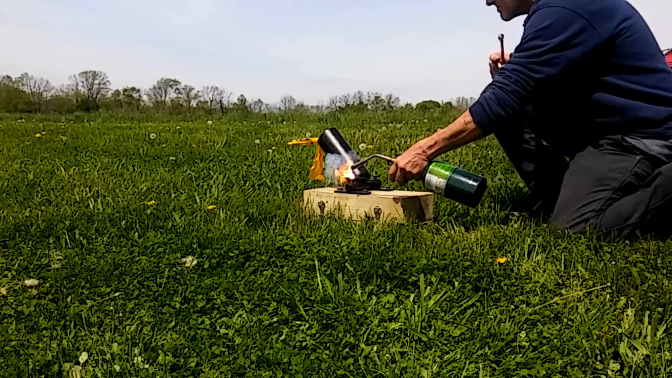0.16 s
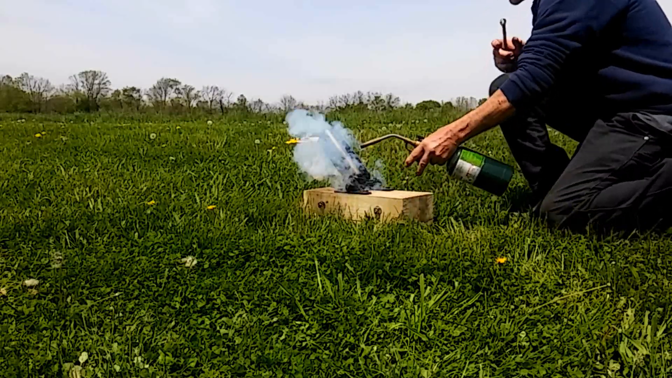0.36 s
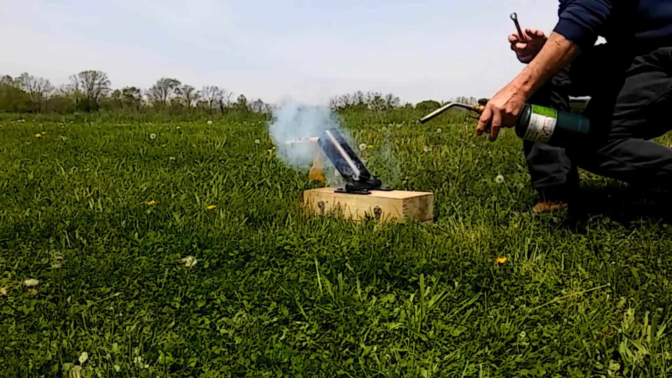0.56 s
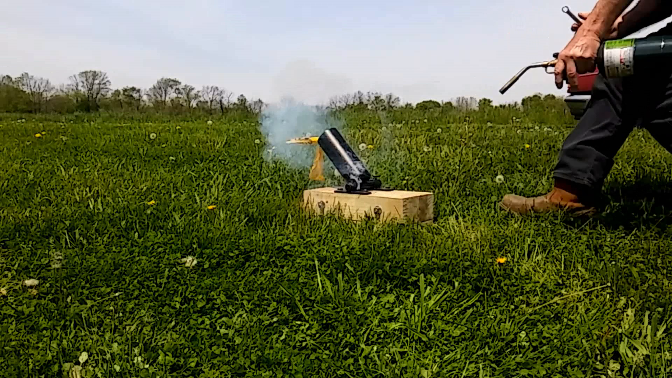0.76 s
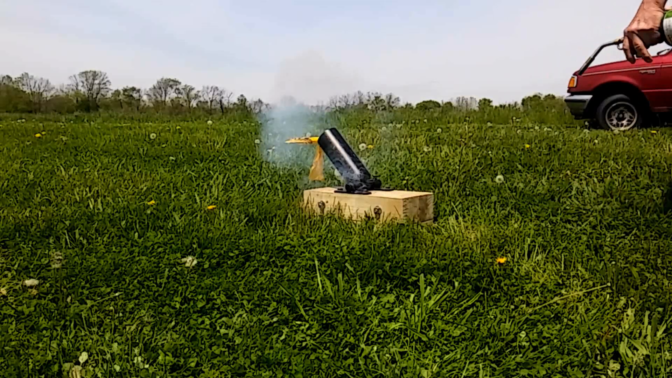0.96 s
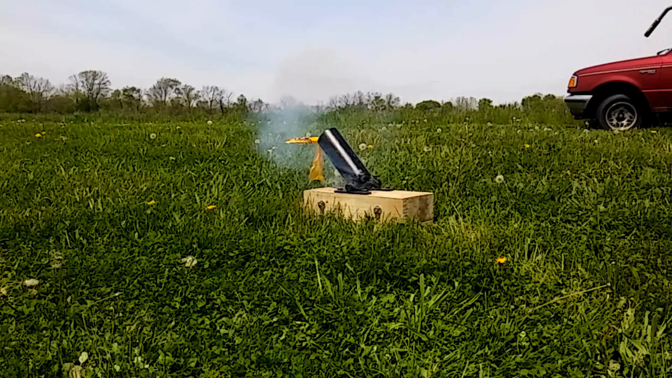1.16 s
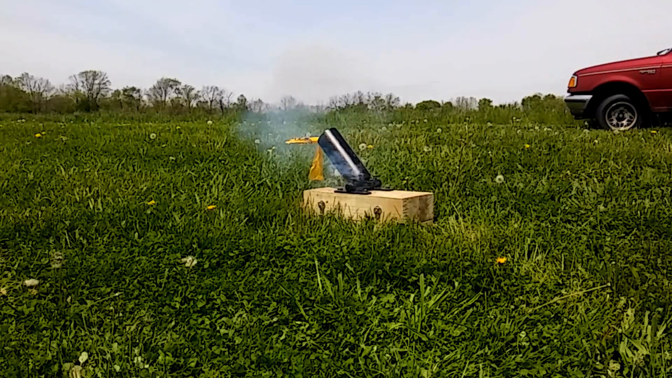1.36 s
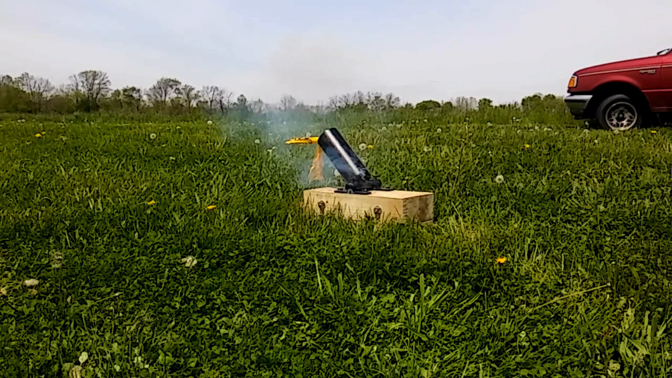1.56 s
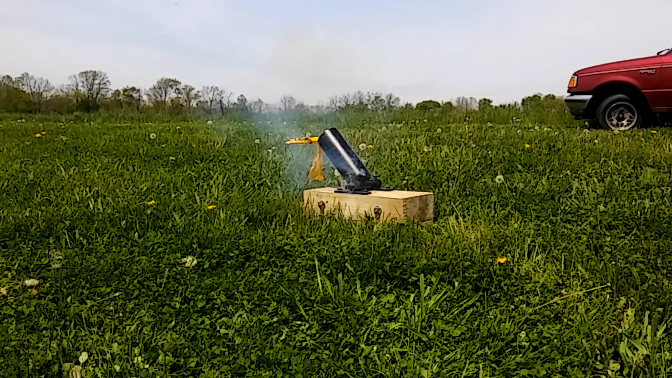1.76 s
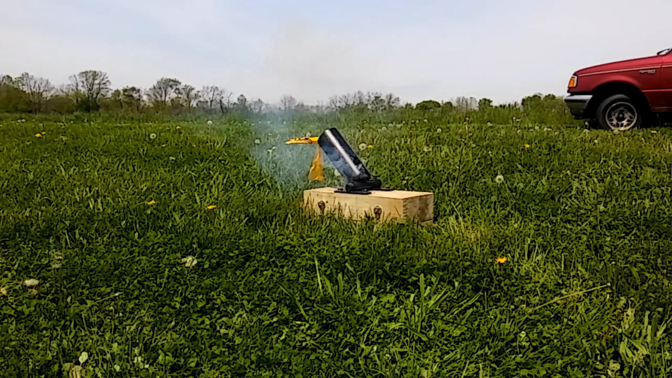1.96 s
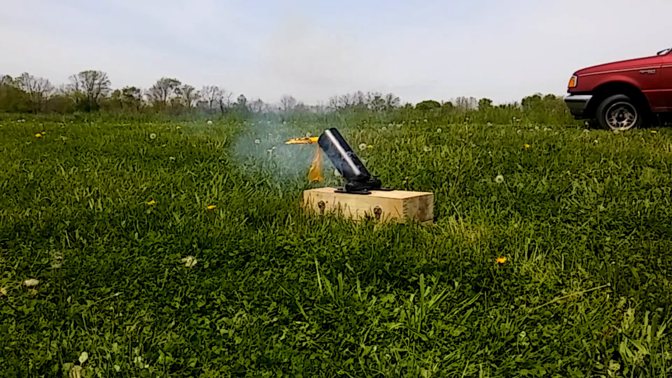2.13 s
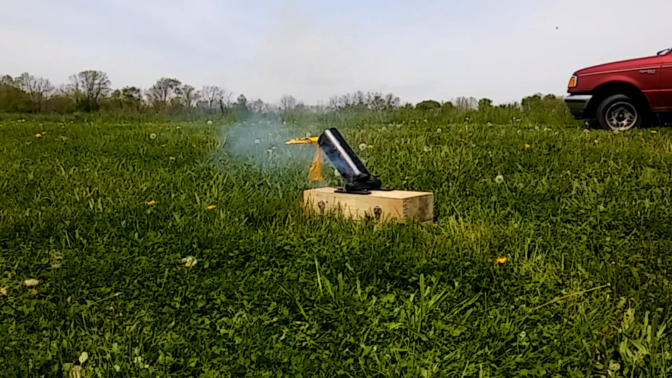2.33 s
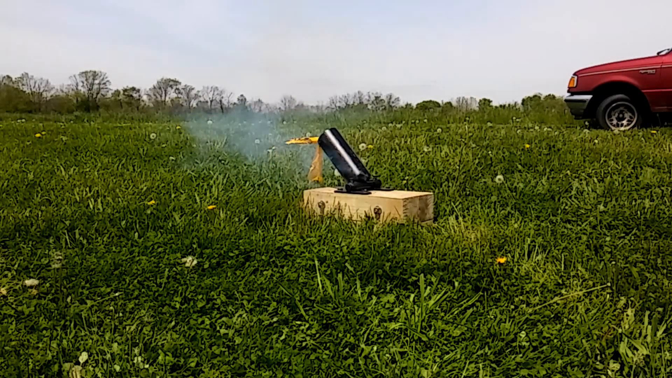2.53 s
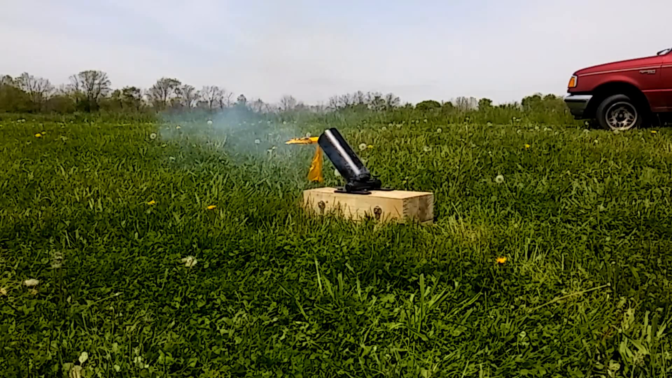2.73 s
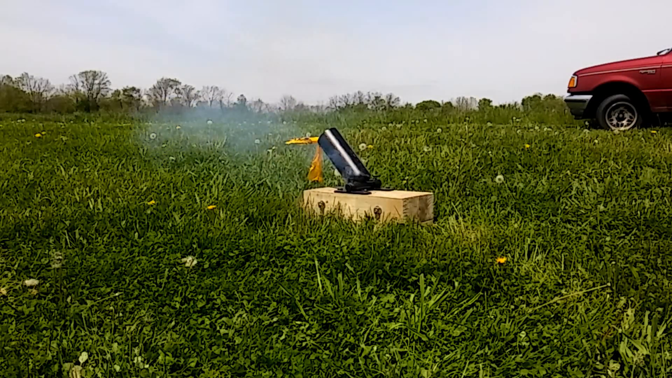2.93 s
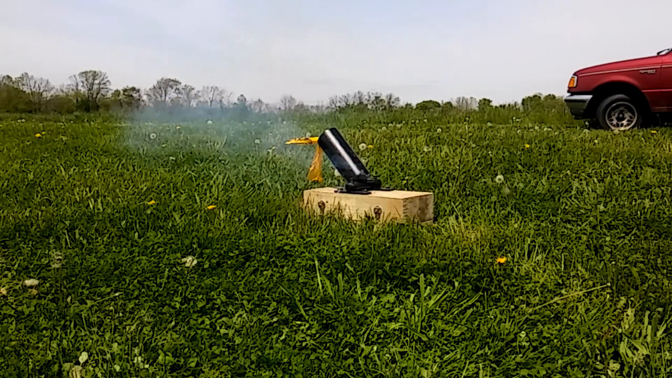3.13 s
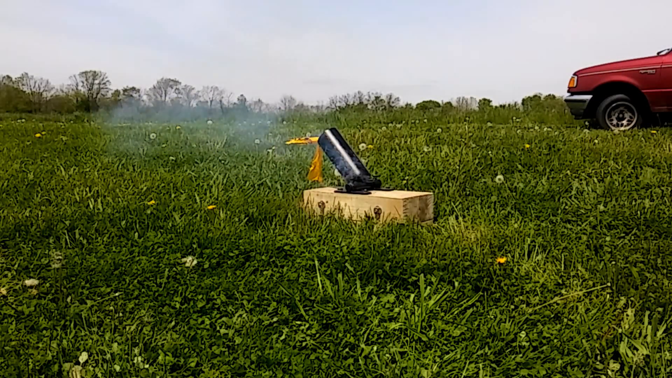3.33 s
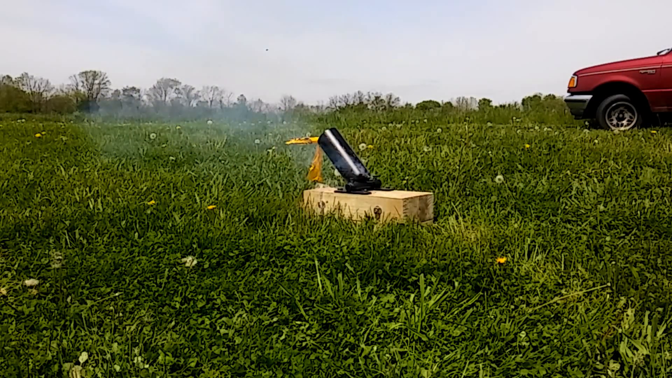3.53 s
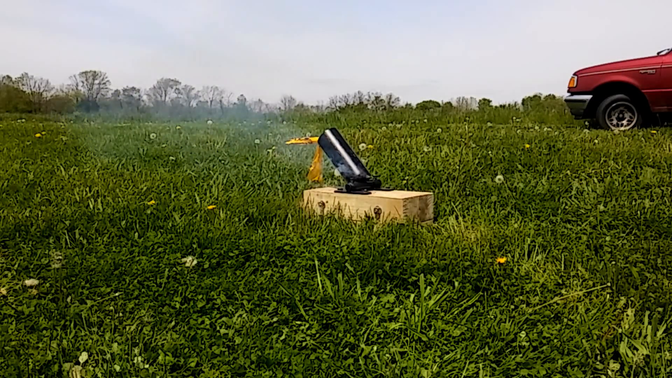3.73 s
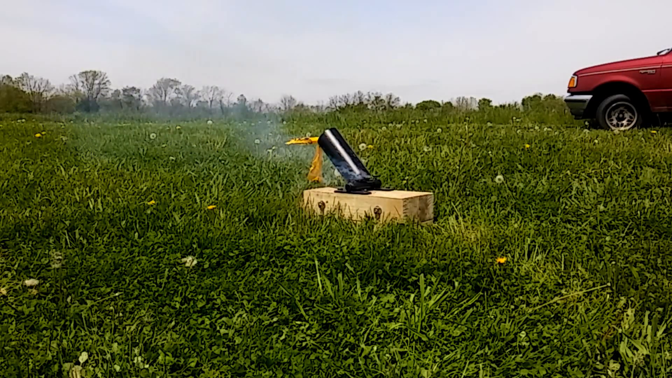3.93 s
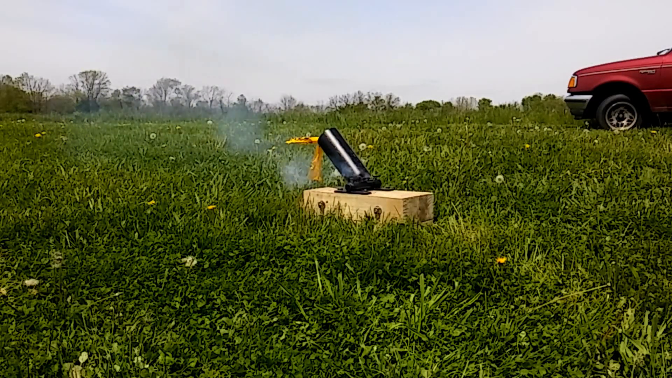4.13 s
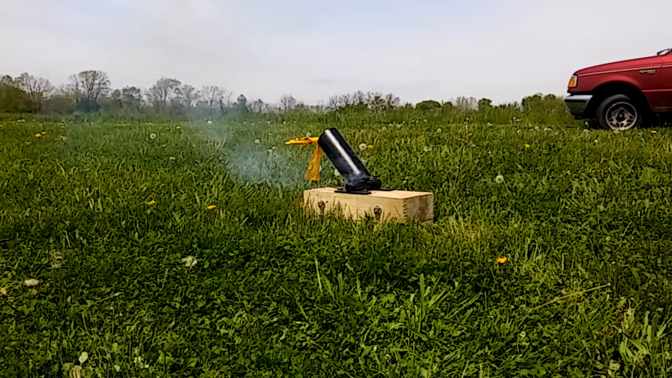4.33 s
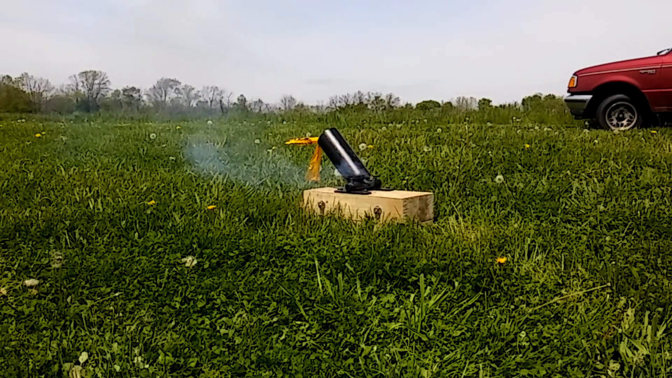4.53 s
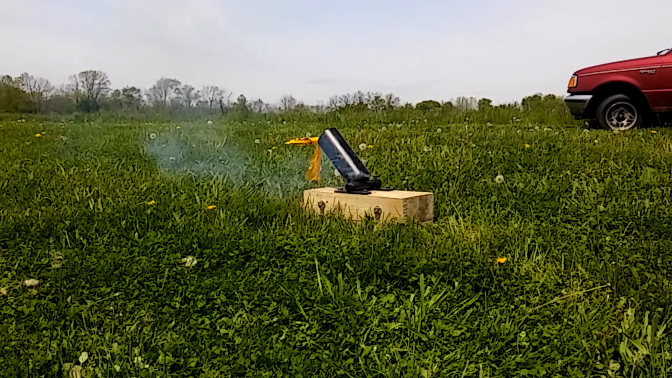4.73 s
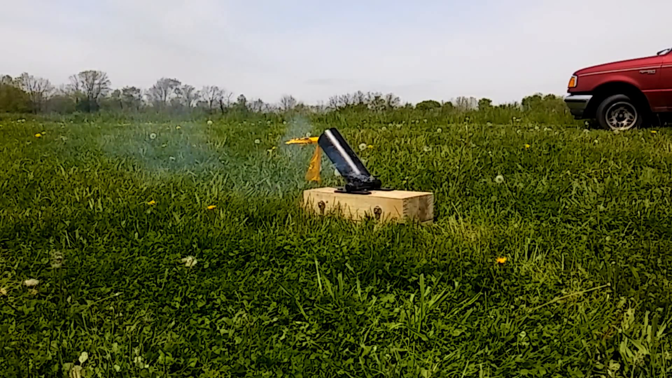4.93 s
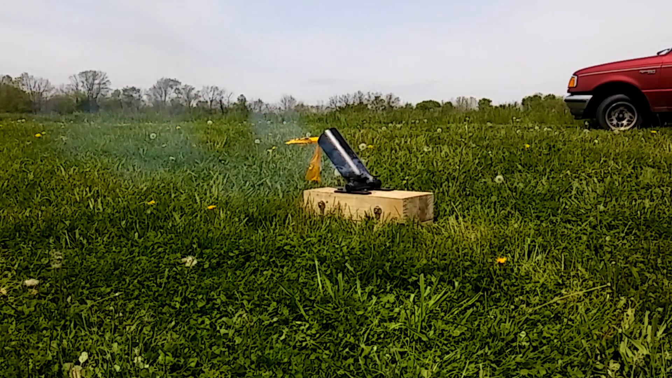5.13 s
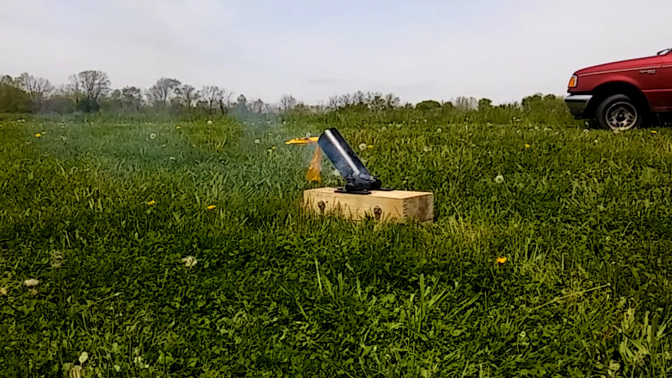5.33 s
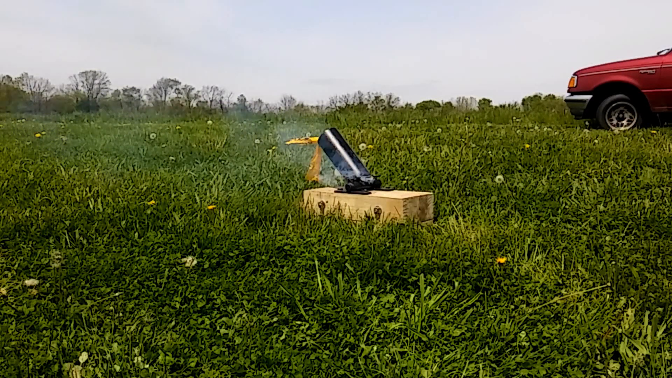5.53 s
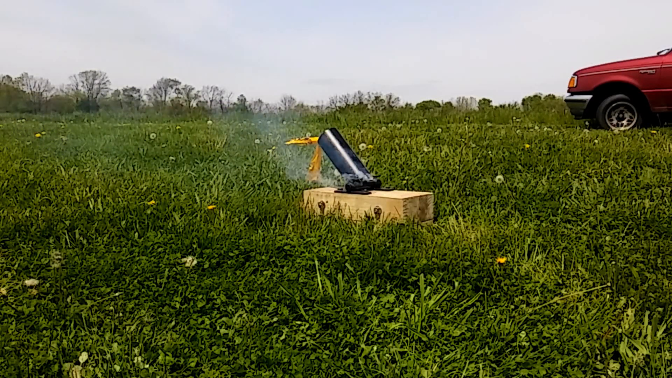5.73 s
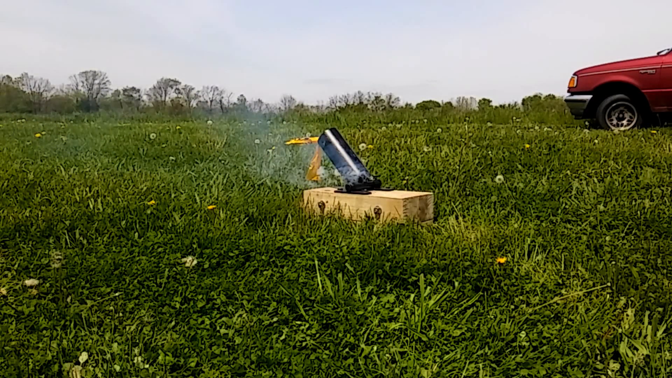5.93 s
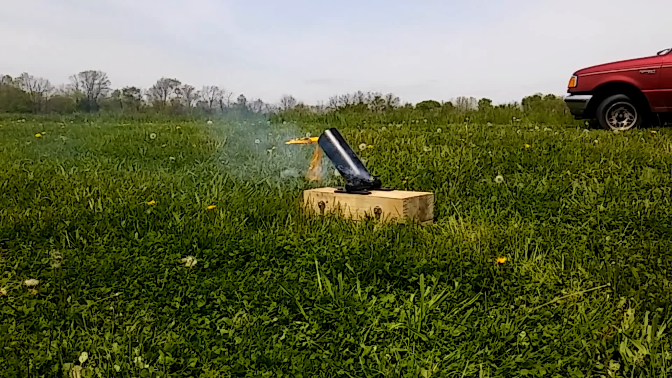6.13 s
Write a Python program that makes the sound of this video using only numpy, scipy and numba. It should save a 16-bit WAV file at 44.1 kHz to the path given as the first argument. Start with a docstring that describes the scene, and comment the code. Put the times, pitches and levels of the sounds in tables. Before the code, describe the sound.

A gas torch roars briefly, then a lit fuse hisses and sputters steadily in an open field, with soft thuds and faint wind beneath.

```python
"""A gas torch roars for a moment in an open field, lights a fuse and is carried off. Flame and gas hiss are
shaped noise; puffs of a wavering note sing in the burner tube. The fuse is a noisy jet of hot gas that surges
and falters, shifting colour as it burns down towards the barrel, with a few sparks that burst.
Soft thuds, a short low hum, light wind and the murmur of the field lie beneath.
One small microphone stands a few metres away."""
import sys
import numpy as np
from scipy import signal
from scipy.fft import rfft, irfft
from scipy.io import wavfile
from scipy.ndimage import uniform_filter1d, map_coordinates
from numba import njit

SR = 44100
rng = np.random.default_rng(int(sys.argv[2]) if len(sys.argv) > 2 else 0)


def master_out(mix):
    """Clip the mix to full scale and print it as 16-bit PCM to the path in sys.argv[1]."""
    frames = np.transpose(np.atleast_2d(mix))
    ceiling = np.clip(frames, -1, 1)
    pcm = np.round(ceiling * 32767).astype(np.int16)
    wavfile.write(sys.argv[1], SR, pcm)


N = 277464  # length in samples


def undb(db):
    """Turn decibels into a plain gain."""
    return 10 ** (np.asarray(db) / 20)


def unit(x):
    """Scale a signal to an rms (average strength) of 1."""
    return x / np.sqrt(np.mean(x ** 2))


def noise():
    """Plain hiss, equally strong at all pitches."""
    return rng.standard_normal(N)


def curves(table):
    """Join the rows of a table with straight lines in time, one line per column after the seconds."""
    s, *columns = np.transpose(table)
    return [np.interp(np.arange(N) / SR, s, c) for c in columns]


def coloured(x, points):
    """Shape the spectrum of a signal to (Hz, dB) points, then set its rms to 1."""
    hz, db = np.transpose(points)
    f = np.arange(N // 2 + 1) * SR / N + 1  # 1 Hz is added so that the logarithm exists at zero
    gain_db = np.interp(np.log(f), np.log(hz), db, left=-120)
    return unit(irfft(rfft(x) * undb(gain_db), N))


def walk(rate):
    """Random levels, `rate` new ones a second, smoothed twice into a wandering line of rms 1."""
    k = int(SR / rate)
    steps = np.repeat(rng.standard_normal(N // k + 1), k)
    return unit(uniform_filter1d(uniform_filter1d(steps, k), k)[:N])


def restless(x, lo_hz, count, own_db, rate, tilt_db=0):
    """Half-octave bands that each flicker alone; a tilt lifts the upper ones and lowers the lower ones."""
    octave = np.log2((np.arange(N // 2 + 1) * SR / N + 1) / lo_hz)
    spectrum, out = rfft(x), 0
    for k in range(count):
        share = np.interp(2 * octave, np.arange(count), np.arange(count) == k)
        height = 2 * k / (count - 1) - 1  # -1 for the lowest band, 1 for the highest
        out = out + irfft(spectrum * share, N) * undb(own_db * walk(rate) + tilt_db * height)
    return out


@njit
def band(x, hz, width):
    """Keep a band around a moving centre, with gain 1 there (a state-variable filter)."""
    y, b, l = np.empty(len(x)), 0., 0.
    for i in range(len(x)):
        g, k = np.tan(np.pi * hz[i] / SR), width / hz[i]
        v = (b + g * (x[i] - l)) / (1 + g * (g + k))
        b, l, y[i] = 2 * v - b, l + 2 * g * v, k * v
    return y


def tone(hz):
    """A pure tone of rms 1 that follows a line of pitch."""
    return np.sqrt(2) * np.sin(2 * np.pi * np.cumsum(hz) / SR)


def swell(at_s, rise_s, fall_s):
    """A smooth bump, 1 at its moment."""
    t = np.arange(N) / SR - at_s
    return np.exp(-(t / np.where(t < 0, rise_s, fall_s)) ** 2)


def fading(db, from_s, db_per_s):
    """Gain that holds, then falls steadily."""
    return undb(db - db_per_s * np.maximum(np.arange(N) / SR - from_s, 0))


def add(out, at_s, sound):
    """Mix a short sound in, centred on a moment."""
    i = int(at_s * SR) - len(sound) // 2
    out[i:i + len(sound)] += sound


def torch():
    """Turbulent flame over nozzle hiss; both hold until the torch is turned away, while the tube sings."""
    # Broad roar of the flame. Each row: pitch in Hz, relative strength in dB per Hz.
    flame_colour = [(50, -62), (150, -13.5), (220, -7), (480, -3), (800, -8), (1100, -14.5), (1350, -30),
                    (1700, -60)]
    # Hiss of the gas leaving the nozzle. Each row: pitch in Hz, relative strength in dB per Hz.
    nozzle_colour = [(760, -42), (1300, -13), (1810, 0.5), (2210, -5), (3450, -5.5), (3640, -5),
                     (3750, -13.5), (4620, -5.5), (6310, -11), (6510, -9.5), (7610, -10), (9470, -21),
                     (15600, -33)]
    # The burner tube sings in puffs. Each row: peak moment in seconds, pitch in Hz, level in dB,
    # fall time in seconds.
    puff_rows = [(.004, 633, -33, 0.019), (.029, 591.6, -31, 0.008), (.055, 618, -33.5, 0.032),
                 (.096, 609, -31, 0.024), (0.136, 592.3, -33.5, 0.026), (.172, 565, -31.5, 0.038),
                 (0.224, 582, -30.5, .007), (0.258, 573, -33, .01), (0.282, 625, -33.5, .02)]

    hz = curves(puff_rows)[0]
    wavering = tone(hz * (1 + 0.021 * walk(59)))
    ringing = unit(band(noise(), hz, 70.))  # noise that blurs the note
    note = wavering + 0.4 * ringing
    puffs = sum(undb(db) * swell(s, 0.0036, fall_s) for s, _, db, fall_s in puff_rows)
    roar = fading(db=-36.5, from_s=0.31, db_per_s=104) * coloured(noise(), flame_colour)
    hiss = fading(db=-40.5, from_s=0.25, db_per_s=45) * coloured(noise(), nozzle_colour)
    return roar + hiss + puffs * note


def murmur():
    """The far murmur of the field: low noise whose bands flicker separately."""
    # Colour of the murmur. Each row: pitch in Hz, relative strength in dB per Hz.
    field_colour = [(18, -45), (30, -31), (108, -1.5), (180, -2.5), (372, -2.5), (440, -2.5), (548, -2),
                    (910, -4), (1230, -16.5), (1460, -18), (1700, -11), (2210, -11), (3740, -120)]
    # Slow change of its level. Each row: time in seconds, change in dB.
    field_change = [(0, 1), (3.5, -1.5), (6.3, -3)]

    level_db = -55.5 + curves(field_change)[0]
    flicker = restless(coloured(noise(), field_colour), 38.4, count=11, own_db=2.4, rate=9.9)
    return undb(level_db) * flicker


def wind():
    """Moving air thumps on the microphone: deep flickering noise, a breeze plus single buffets."""
    # Steady breeze. Each row: time in seconds, level in dB.
    breeze_level = [(0, -76), (1.8, -79), (2.9, -70), (3.4, -62.5), (3.85, -83), (4.6, -59.5), (5.2, -61),
                    (5.4, -71), (6.0, -77), (6.29, -63)]
    # Single buffets. Each row: peak moment in seconds, level in dB.
    buffet_rows = [(.4, -57), (2.29, -65), (2.54, -65), (3.56, -57), (3.93, -61), (4.12, -58), (4.36, -59),
                   (4.66, -57), (4.85, -53), (5.05, -59), (5.54, -54.5), (5.64, -60), (6.23, -64)]

    colour = [(20, -34), (40, -14), (58, -6.5), (110, -5.5), (250, -17.5), (600, -70)]  # Hz, dB per Hz
    rumble = coloured(noise(), colour) * undb(1.9 * walk(25))
    buffets = sum(undb(db) * swell(s, rise_s=0.031, fall_s=0.052) for s, db in buffet_rows)
    return (undb(curves(breeze_level)[0]) + buffets) * rumble


def surroundings(jet, stage):
    """Block and barrel add faint echoes, and dips in the spectrum that slide as the flame moves."""
    # Each row: delay at the free end in ms, delay at the barrel in ms, level in dB.
    echo_rows = [(.97, 0.97, -40), (1.66, 1.56, -32), (2.3, 2.5, -33), (3.0, 2.4, -31.5), (3.7, 3.5, -17.5)]
    # Each row: centre of a narrow dip in Hz at the free end, midway and at the barrel.
    dip_rows = [(3900, 4240, 4850), (7400, 8740, 9050), (9080, 10000, 10700), (11150, 10900, 11550),
                (13600, 14600, 12000)]

    out = jet
    for free_end_ms, barrel_ms, db in echo_rows:
        delay_ms = free_end_ms + (barrel_ms - free_end_ms) * stage / 2
        lag = delay_ms * SR / 1000  # in samples
        out = out + undb(db) * map_coordinates(jet, [np.arange(N) - lag], order=1)
    for hz in dip_rows:
        centre_hz = np.interp(stage, np.arange(3), hz)
        out = out - 0.32 * band(out, centre_hz, 324.0)
    return out


def fuse():
    """Powder grains flare in a dense spray; the whole jet of hot gas sputters with them."""
    # Strength of the jet before a small fixed lift. Each row: time in seconds, level in dB.
    jet_level = [(0.3, -43.5), (0.5, -37), (0.55, -39.5), (1.27, -40), (1.43, -46.5), (1.52, -39.5),
                 (2.02, -40), (2.03, -43.5), (2.28, -37.5), (2.4, -42), (2.63, -37.5), (2.67, -39.5),
                 (2.99, -39), (3.25, -40), (3.27, -43.5), (3.3, -38), (3.39, -44.5), (3.4, -40.5),
                 (3.94, -37.5), (3.99, -41), (4.22, -40.5), (4.4, -37.5), (4.45, -41), (4.57, -37.5),
                 (4.62, -43.5), (4.69, -44), (4.74, -40.5), (5.07, -42), (5.15, -48.5), (5.22, -38.5),
                 (5.55, -44.5), (5.6, -38), (5.67, -40.5), (5.76, -46), (5.87, -39), (6.02, -45.5),
                 (6.06, -43.5), (6.29, -45)]
    # How far the flame has come. Each row: time in seconds, stage (0 free end, 1 midway, 2 at the barrel).
    burn_stage = [(0, 0), (2.2, 0.37), (3.6, 0.9), (4.2, 1.3), (5, 1.69), (6.3, 1.9)]
    # Drift of treble against lower hiss. Each row: time in seconds, lift of the top band in dB
    # (the lowest band drops as much).
    treble_drift = [(.3, -3), (.7, 0), (2.75, -1), (2.9, 3), (3.1, -0.5), (4.9, -1), (5.15, 1), (5.35, 0),
                    (5.7, 4.5), (5.95, 0), (6.29, 4)]
    # Jet colours, with the dips that echoes off ground, block and barrel leave.
    # Each row: pitch in Hz, relative strength in dB per Hz.
    free_end_colour = [(760, -52), (1300, -22), (1850, -10.5), (2210, -11), (2480, -6), (2750, -8),
                       (3950, -7.5), (4390, -6), (6650, -0.5), (7450, -2.5), (8100, -9), (9770, -8.5),
                       (11200, -14.5), (15000, -14), (15600, -23)]
    midway_colour = [(760, -61), (1300, -45), (1430, -35), (1650, -12.5), (1950, -5), (2230, -9),
                     (2690, -3.5), (3750, -3), (4480, -7), (6930, 1), (8710, -4.5), (9560, -5),
                     (11200, -12), (14100, -11.5), (15600, -13)]
    barrel_colour = [(760, -40), (1300, -22.5), (1700, -34), (1890, -13), (2160, -4.5), (2640, -13.5),
                     (3380, -1.5), (3950, -3.5), (4670, -7.5), (6380, -1.5), (7450, -5), (9470, -4),
                     (10400, -8.5), (13300, -12), (15600, -14.5)]
    bright_db_per_db, usual_db = 0.5, -40  # a jet above its usual strength is brighter

    level_db = curves(jet_level)[0]
    stage = np.clip(curves(burn_stage)[0], 0, 2)
    bright_db = bright_db_per_db * (level_db - usual_db) + curves(treble_drift)[0]
    spray = noise() * undb(0.54 * walk(40) + 0.81 * walk(400))
    jet = 0
    for k, colour in enumerate((free_end_colour, midway_colour, barrel_colour)):
        share = np.clip(1 - abs(stage - k), 0, 1)  # blend neighbouring colours
        jet = jet + share * coloured(spray, colour)
    jet = surroundings(jet, stage)
    jet = restless(jet, 1520, count=8, own_db=1.08, rate=30, tilt_db=bright_db)
    lit = swell(jet_level[0][0], 0.049, np.inf)  # rises once, then stays at 1
    return lit * undb(level_db + 0.61) * jet


def sparks():
    """A spark bursts: a short rush of noise through a ringing filter, dying away at once."""
    # Each row: start in seconds, approximate peak in dB, pitch of the ring in Hz.
    spark_rows = [(.348, -31, 5940), (.395, -32.5, 6000), (2.122, -32.5, 4380), (5.2, -43, 6160)]

    out = np.zeros(N)
    t = np.arange(1024) / SR
    for at_s, db, hz in spark_rows:
        burst = signal.lfilter(*signal.iirpeak(hz, 3.5, SR), rng.standard_normal(len(t)))
        # add() centres a sound, so half its length puts the start on at_s
        add(out, at_s + t[-1] / 2, undb(db) / 2 * unit(burst) * np.exp(-t / 0.018))
    return out


def thuds():
    """Steps and gear touch the grass softly: a few cycles that swell and die, some sinking in pitch."""
    # Each row: middle in seconds, approximate peak in dB, mean pitch in Hz, number of cycles,
    # fall of pitch (0 to 1).
    thud_rows = [(0.501, -42, 193, 2.9, 0), (.52, -45, 1310, 12, 0.2), (1.376, -42.5, 503, 3.3, 0),
                 (1.399, -44, 250, 2.5, 0), (1.416, -33, 405, 2.1, 0.86), (2.123, -41, 965, 7.9, 0.1),
                 (2.304, -34.5, 445, 2.8, 0.5), (3.57, -46, 150, 2, 0.3), (4.652, -31.5, 199, 2.7, 0),
                 (4.81, -46, 127, 2, 0.3), (6.21, -50, 143, 1.7, .1)]

    out = np.zeros(N)
    for at_s, db, hz, cycles, fall in thud_rows:
        length = SR * cycles / hz  # in samples
        u = np.arange(int(length)) / length  # runs from 0 to 1 through the thud
        turns = cycles * u * (1 + fall * (1 - u))
        shape = np.sin(np.pi * u) ** 2
        push = shape * np.sin(2 * np.pi * turns)
        balanced = push - shape * push.sum() / shape.sum()  # no net push of the air
        add(out, at_s, undb(db) * balanced)
    return out


def hum():
    """A short low hum: a wavering tone with a weaker one an octave above, swelling once."""
    hz = 109.5 * (1 + 0.0061 * walk(8.0))
    octave_db = -5  # against the lower tone
    tones = tone(hz) + undb(octave_db) * tone(2 * hz)
    return undb(-60.5) * swell(1.24, rise_s=0.28, fall_s=0.42) * tones


def scene():
    """All sources share the path over the grass, whose bounce cancels part of one band."""
    # The dip left by the bounce: centre in Hz, width in Hz, depth (0 to 1).
    ground_dip = (1384, 290, 0.36)

    dry = torch() + murmur() + wind() + fuse() + sparks() + thuds() + hum()
    hz, width, depth = ground_dip
    cancelled = depth * band(dry, np.full(N, 1. * hz), 1. * width)
    return np.tile(dry - cancelled, (2, 1))


def record(dry):
    """One microphone capsule feeds both channels; the top is cut steeply."""
    top_hz = 15740
    low_pass = signal.ellip(16, 0.2, 90, top_hz, fs=SR, output="sos")  # 0.2 dB ripple, 90 dB cut
    return signal.sosfilt(low_pass, dry)


dry = scene()
out = record(dry)
master_out(out)
```